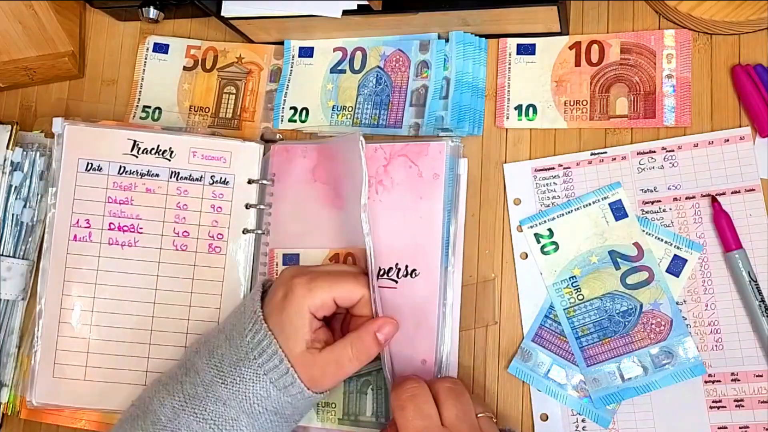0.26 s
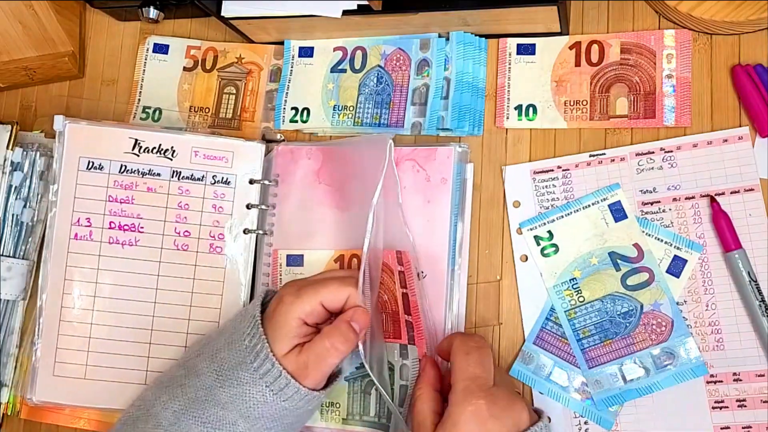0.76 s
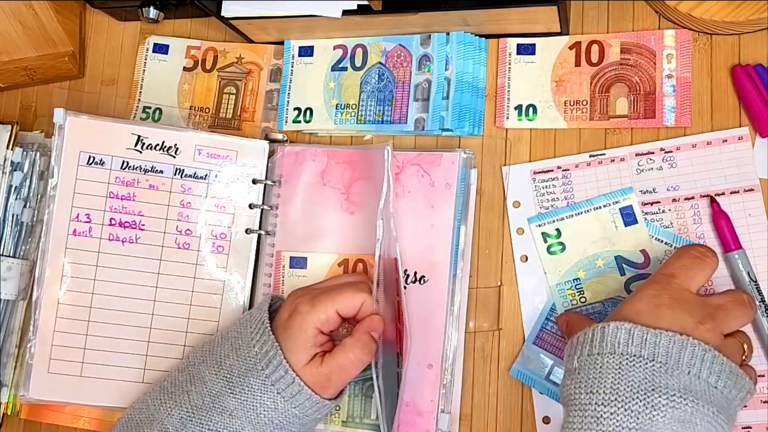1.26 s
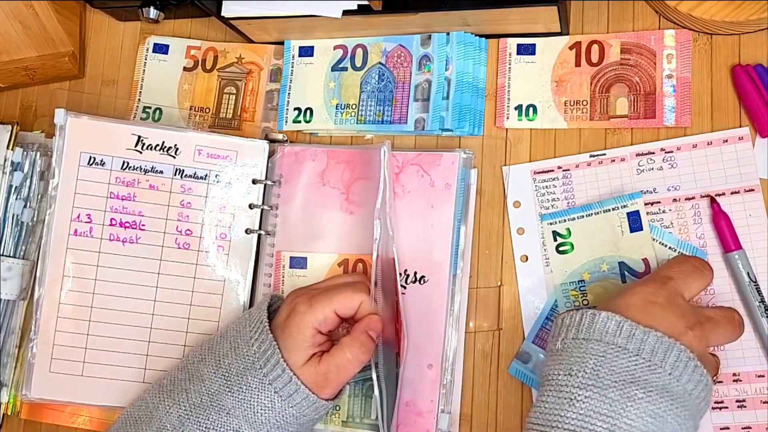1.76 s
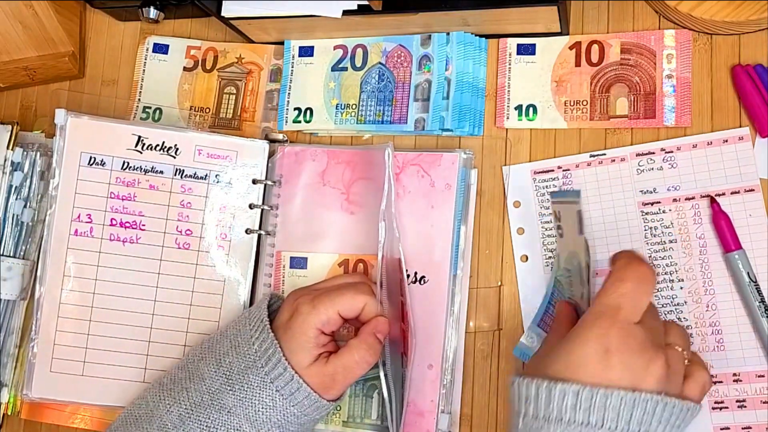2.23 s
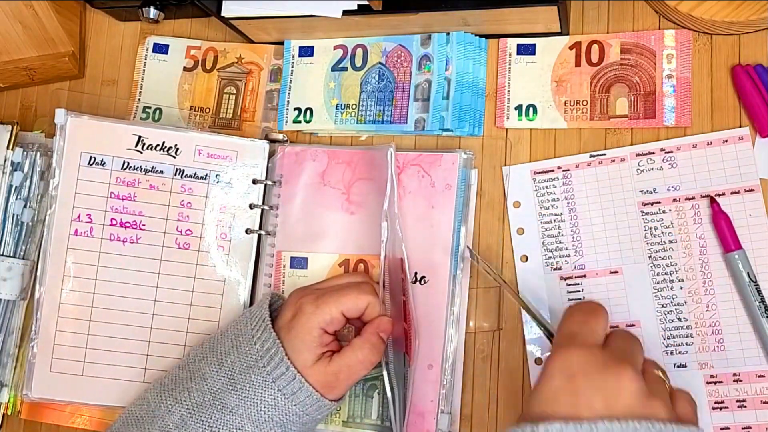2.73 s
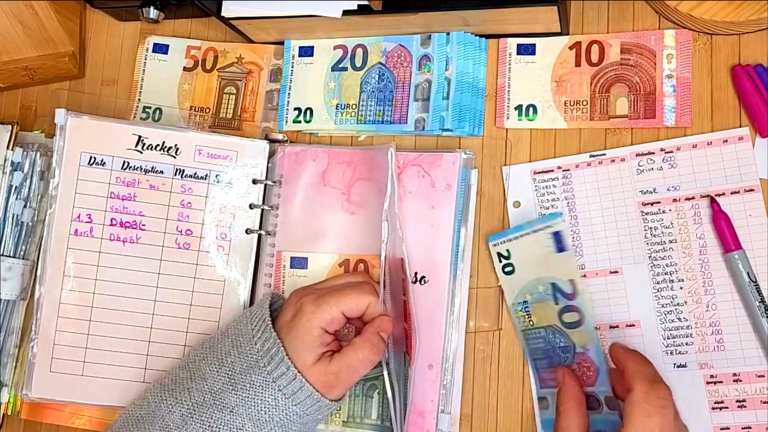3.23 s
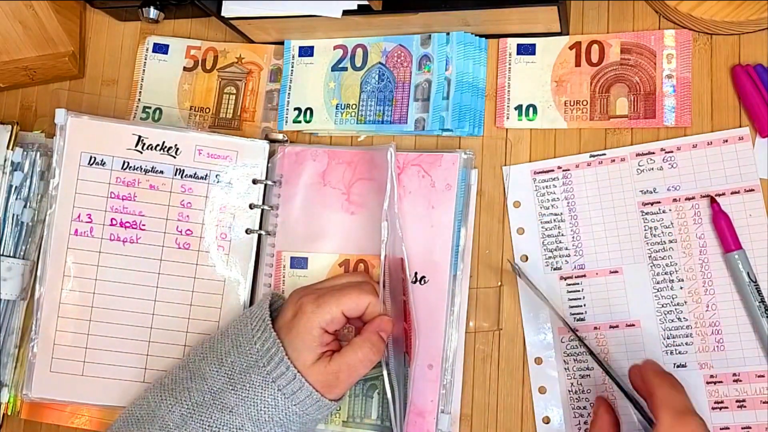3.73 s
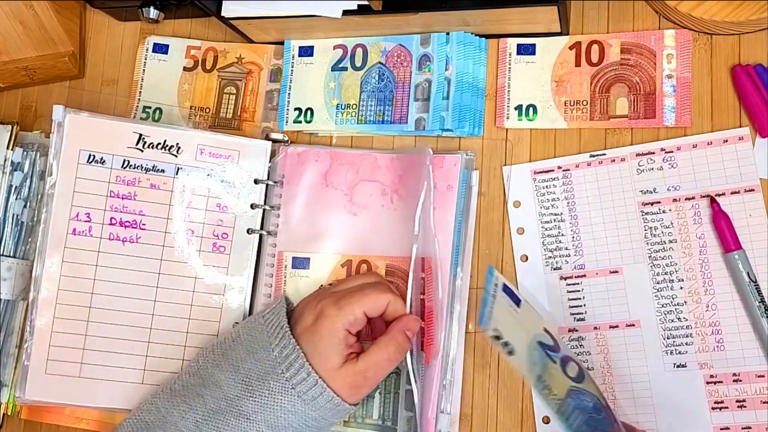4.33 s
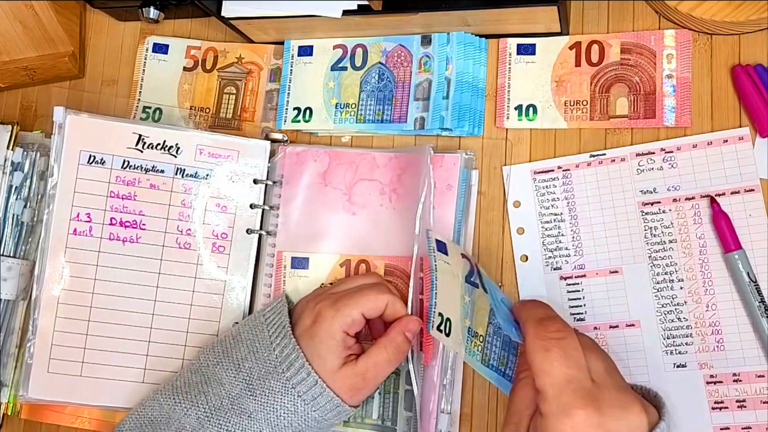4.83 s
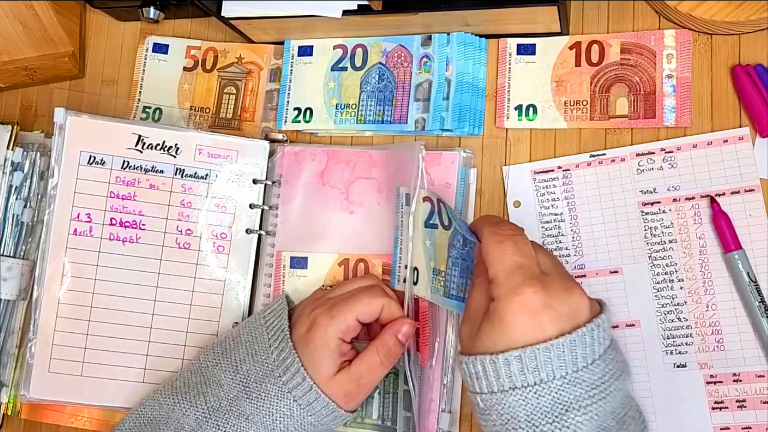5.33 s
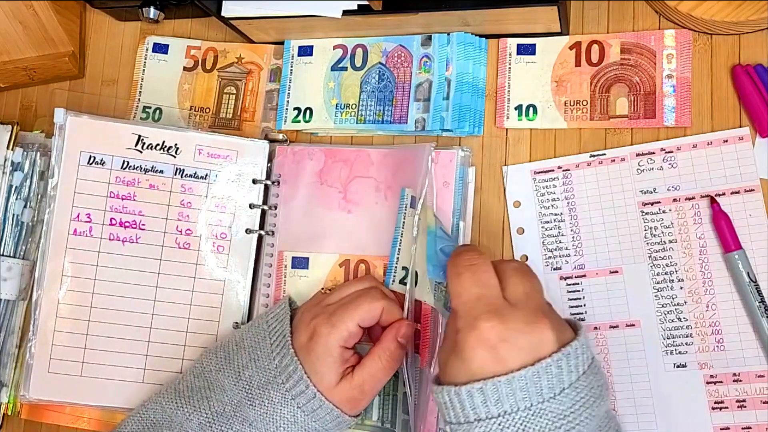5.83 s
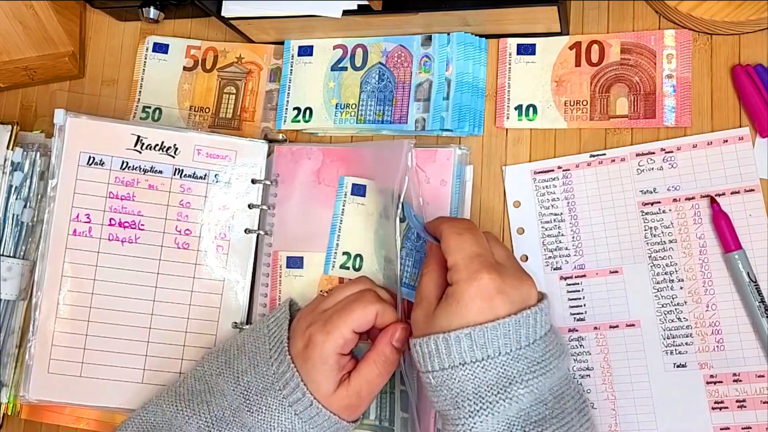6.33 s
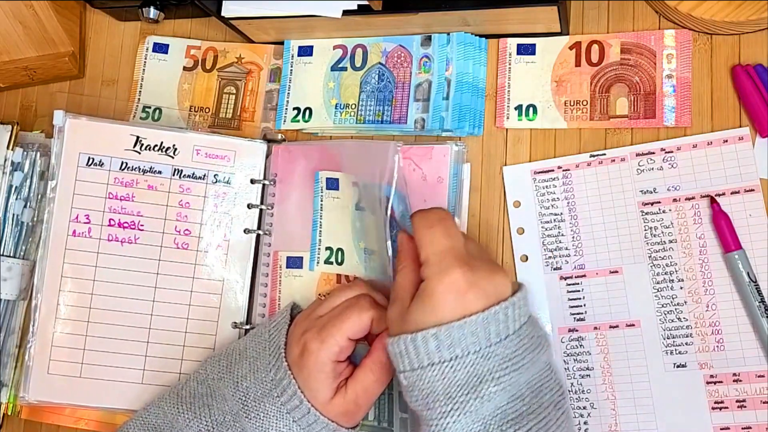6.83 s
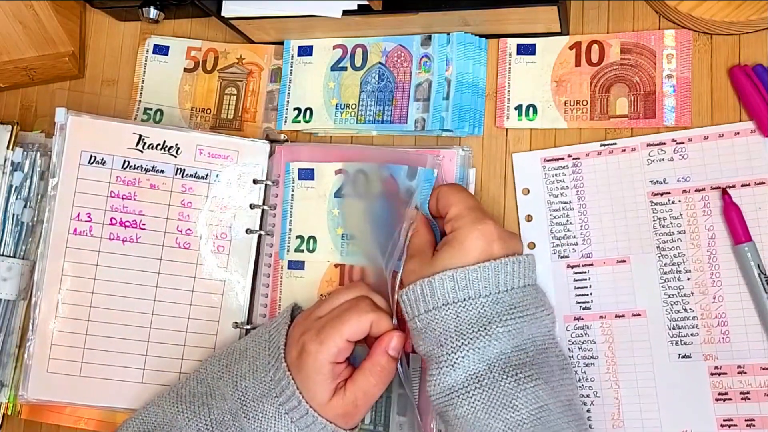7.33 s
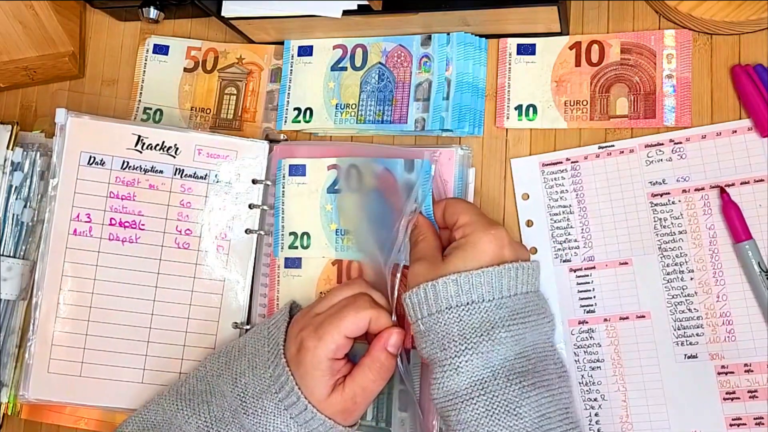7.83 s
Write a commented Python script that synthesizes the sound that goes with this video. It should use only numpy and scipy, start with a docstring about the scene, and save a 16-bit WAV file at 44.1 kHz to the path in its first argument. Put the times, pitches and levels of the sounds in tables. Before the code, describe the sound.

Crisp paper money handling and crinkling plastic at a wooden desk, with soft taps and a far door thudding in a small room.

```python
"""Paper rustles and snaps as hands open a plastic binder pocket, pick up two banknotes and slide them in.
Sheets rub in dense grains, hollower inside the pocket; their creases crack, ring and flutter.
Fingers knock on the binder and the wooden desk. A far door thuds through the floor and rattles
the furniture. The small room adds a short echo, a hush and a low rumble."""
import sys
import numpy as np
from scipy import signal
from scipy.fft import rfft, irfft, next_fast_len
from scipy.io import wavfile
from scipy.ndimage import uniform_filter1d

SR = 44100
rng = np.random.default_rng(int(sys.argv[2]) if len(sys.argv) > 2 else 0)


def transcribe(signal):
    """Save signal, clipped to [-1, 1], as a 16-bit WAV file at the path in sys.argv[1]."""
    frames = np.atleast_2d(signal).T
    limited = np.clip(frames, -1, 1)
    pcm = np.round(limited * 32767).astype(np.int16)
    wavfile.write(sys.argv[1], SR, pcm)


N = 355575

# tone of rubbed and snapped paper: (frequency [Hz], level per Hz [dB])
PAPER_SPECTRUM = [(120, -62), (200, -8), (294, -0.5), (538, -3), (579, 3.5), (659, -4.5), (899, 4),
                  (1060, -1), (1980, 10.5), (2800, 2), (6760, 4.5), (8580, 9.5), (12600, 8), (16000, 4.5)]


def from_db(db):
    """Gain of a level in dB."""
    return 10 ** (np.asarray(db) / 20)


def rms_one(x):
    """Scales to rms 1."""
    return x / np.sqrt(np.mean(x ** 2) + 1e-20)


def in_time(points):
    """A (time, value) curve, sample by sample."""
    return np.interp(np.arange(N) / SR, *np.transpose(points))


def at_hz(points, hz):
    """A (frequency, value) curve read on a log-frequency axis."""
    known_hz, values = np.transpose(points)
    return np.interp(np.log(hz), np.log(known_hz), values)


def colour(x, spectrum):
    """Gives white input a spectrum in dB."""
    size = next_fast_len(N, real=True)
    hz = np.maximum(np.arange(size // 2 + 1) * SR / size, 1)
    return irfft(rfft(x, size) * from_db(at_hz(spectrum, hz)), size)[..., :N]


def stereo(x):
    """Two unrelated signals become left and right, alike in the bass and unlike in the treble."""
    # stereo image: (frequency [Hz], left-right correlation [-1..1])
    likeness = [(60, 0.88), (180, 0.76), (550, 0.5), (1650, 0.32), (4970, 0.009), (15000, -0.26)]
    size = next_fast_len(N, real=True)
    hz = np.maximum(np.arange(size // 2 + 1) * SR / size, 1)
    alike = np.clip(at_hz(likeness, hz), 0, 1)
    mid, side = rfft(x, size) * np.sqrt([1 + alike, 1 - alike])
    return irfft([mid + side, mid - side], size)[:, :N] / np.sqrt(2)


def widen(mid, side):
    """Left and right from mid and side."""
    return mid + side * np.array([[1], [-1]])


def pan(left_db):
    """Left and right gain; positive leans left."""
    return from_db(np.array([left_db, -left_db]) / 2)


def drift(rate_hz):
    """A smooth random wander of rms 1."""
    step = 40
    r = np.exp(-2 * np.pi * rate_hz * step / SR)
    slow = signal.lfilter([1], [1, -2 * r, r * r], rng.standard_normal(N // step + 2002))[2000:]
    return np.interp(np.arange(N) / step, np.arange(len(slow)), rms_one(slow))


def grainy_noise(spread_db):
    """Two white noises whose level jumps from sample to sample."""
    return rng.standard_normal((2, N)) * from_db(spread_db * np.minimum(rng.exponential(1, N), 5))


def resonate(x, peaks):
    """Parallel resonances of alternating sign: (frequency [Hz], width [Hz], level [dB])."""
    out = 0
    for k, (hz, width, db) in enumerate(peaks):
        r = np.exp(-np.pi * width / SR)
        poles = [1, -2 * r * np.cos(2 * np.pi * hz / SR), r * r]
        out += (-1) ** k * from_db(db) * signal.lfilter([(1 - r * r) / 2, 0, (r * r - 1) / 2], poles, x)
    return out


def bands(x):
    """Splits into middle, body, edge and sheen."""
    cuts = [([1300, 3000], "band"), ([300, 1300], "band"), ([3000, 6500], "band"), (6500, "high")]
    return [signal.sosfilt(signal.butter(3, hz, kind, fs=SR, output="sos"), x) for hz, kind in cuts]


def swells(s, hold, db, rise, fall):
    """Summed envelopes that peak at s, hold and fade; rise and fall in s per 20 dB, 5 ms at least."""
    step = 100
    t = np.arange(N // step + 2)[:, None] * step / SR
    before = np.maximum(s - t, 0) / np.maximum(rise, .005)
    after = np.maximum(t - s - hold, 0) / np.maximum(fall, .005)
    gain = from_db(db - 20 * (before + after)).sum(axis=1)
    return np.interp(np.arange(N) / step, np.arange(len(t)), gain)


def room_hush():
    """A faint, steady bed of room tone."""
    # room tone: (frequency [Hz], level per Hz [dB])
    spectrum = [(88, -25.5), (150, 11.5), (194, 1), (356, 3), (643, -10), (2350, -10), (3490, -23),
                (7510, -9.5), (15300, -18.5), (16500, -32.5)]
    return from_db(-68) * rms_one(colour(stereo(rng.standard_normal((2, N))), spectrum))


def room_rumble():
    """Deep noise that wavers; now and then a low bump of the desk swells it."""
    # tone of the rumble: (frequency [Hz], level per Hz [dB])
    spectrum = [(12, -48), (20, -5.5), (59, 4.5), (70, 10), (87, -12), (118, 3.5), (173, -35.5), (220, -13),
                (290, -30.5), (480, -120)]
    # its slow rise and fall: (time [s], level [dB])
    bed_levels = [(0, -62.5), (1.5, -65), (3, -61.5), (4, -64.5), (4.9, -64), (5.5, -59.5), (6.1, -59.5),
                  (6.9, -60), (7.5, -62.5), (8.06, -67.5)]
    # low bumps of the desk on top: (time [s], level [dB])
    surges = [(0.454, -52), (1.34, -58), (3.25, -60), (4.34, -59.5), (4.61, -60.5), (5.6, -60),
              (6.02, -46.5), (7.18, -59), (7.92, -60.5)]
    s, db = np.transpose(surges)
    gain = from_db(in_time(bed_levels) + 1.6 * drift(4.5)) + swells(s, 0, db, rise=.077, fall=.077)
    return gain * rms_one(colour(stereo(rng.standard_normal((2, N))), spectrum))


def room_echo(x):
    """A diffuse tail for each side that dies band by band, after a short gap."""
    # decay of the room: (frequency [Hz], t60 [s])
    decay_times = [(200, 0.25), (1000, 0.12), (4000, 0.14), (12000, 0.089)]
    t, tail = np.arange(SR // 2) / SR, 0
    for low in 100 * 2 ** np.arange(0, 7.5, .5):
        band = signal.butter(2, [low, low * np.sqrt(2)], "band", fs=SR, output="sos")
        fade = from_db(-60 * t / at_hz(decay_times, low)) * np.clip(t / .0015 - .3, 0, 1)
        tail += signal.sosfilt(band, rng.standard_normal((2, len(t)))) * fade
    return signal.fftconvolve(x, tail / np.sqrt(np.sum(tail ** 2) / 2), axes=1)[:, :N]


def door_thud(sway_hz=38.3, right_lead_rad=.44, rise=.025, rattle_lead_s=.035):
    """The floor sways at its lowest mode, booms in the next ones and shakes the furniture."""
    # the thud and its after-bumps: (time [s], sway hold [s], level [dB], boom [dB], rattle [dB])
    bumps = [(1.723, .05, -24, -6, -11), (1.85, .1, -30.5, -6.5, -15.5), (2.12, .03, -42.5, -4.5, -4.5),
             (2.27, .01, -48, -10, -16.5), (2.42, .01, -52, -4.5, -12), (2.63, .01, -59.5, -4, 1.5),
             (2.73, 0.073, -49.5, -3, -11)]
    # boom of the floor: (frequency [Hz], width [Hz], level [dB])
    floor_modes = [(75, 10, 0), (120, 20, -2)]
    # rattle of the furniture: (frequency [Hz], width [Hz], level [dB])
    furniture_modes = [(269.6, 33, 5.5), (372.7, 21, 3.5), (545, 97, -3), (725, 42, -9)]
    s, hold, db, boom_db, rattle_db = np.transpose(bumps)
    mid, side = rng.standard_normal((2, N))
    shake = widen(mid, .27 * side)
    sway = np.sqrt(2) * np.sin(2 * np.pi * sway_hz * np.arange(N) / SR + [[0], [right_lead_rad]])
    sway *= swells(s, hold, db, rise, fall=.2) * from_db(1.5 * drift(12))
    boom = rms_one(resonate(shake, floor_modes)) * swells(s, 0, db + boom_db, rise, fall=.25)
    rattle = rms_one(resonate(shake, furniture_modes))
    rattle *= swells(s - rattle_lead_s, rattle_lead_s, db + rattle_db, rise, fall=.22)
    return (sway + boom + rattle) * pan(-2.3)[:, None]


def finger_knocks(gain_db=-6):
    """A fingertip strikes every mode: a heavy hand wakes the lowest, a hard nail the upper ones."""
    # fingers on binder and desk: (time [s], level [dB], hand weight [dB], nail hardness [dB])
    knocks = [(0.191, -36.5, -27, -20), (0.422, -36.5, -10, -19), (0.756, -28.5, -32, -17),
              (1.55, -41, -9, 4), (2.094, -50, -7, 0), (2.624, -35.5, -20, 6.5), (4.433, -41.5, -16, 10.5),
              (4.7, -68, 0, 21), (4.982, -55, -10.5, 16), (5.458, -27, -34, 0.5), (6.483, -45.5, -10, 4),
              (6.762, -59, -16, -2), (6.889, -50, -16, 4), (7.142, -32, -21, 4), (7.955, -33.5, -32.5, -18),
              (7.993, -38, -26.5, -25)]
    # ring of the desk: (frequency [Hz], level [dB], t60 [s])
    desk_modes = [(109, 7, 0.24), (266.3, -9.5, 0.16), (353, -4, 0.12), (404.6, 1.5, 0.043),
                  (485, -8.5, 0.074), (608, -2, 0.094), (718, 0.5, .12), (856, 1.5, 0.068),
                  (1006, -1.5, 0.066)]
    s, knock_db, weight_db, nail_db = np.transpose(knocks)
    scatter = rng.normal(0, 2, (len(s), len(desk_modes)))
    out = np.zeros(N)
    for k, ((hz, mode_db, t60), scatter_db) in enumerate(zip(desk_modes, scatter.T)):
        touch_db = weight_db if hz < 200 else nail_db if hz > 500 else 0
        hits = np.full(N, 1e-18)
        hits[np.round(s * SR).astype(int)] = from_db(knock_db + mode_db + gain_db + scatter_db + touch_db)
        r, w = from_db(-60 / (t60 * SR)), 2 * np.pi * hz / SR
        out += (-1) ** k * signal.lfilter([0, np.sin(w)], [1, -2 * r * np.cos(w), r * r], hits)
    return uniform_filter1d(out, size=29, origin=14)   # the soft contact dulls the attack


def sheet_rubbing(ticks_per_s=100, waver_db=2.22, flicker_db=1.27):
    """Fibres slip as dense uneven grains, small creases tick in clumps; the pocket adds resonances."""
    # strokes of sheet on sheet: (time [s], hold [s], level [dB], rise [s per 20 dB],
    # fall [s per 20 dB], body [dB], brightness [dB])
    strokes = [(0.022, 0.001, -51, .1, 0.1, 3, -3), (0.1, 0.001, -67, -0.2, 0.22, 9.5, -7),
               (0.196, 0.031, -64, 0.05, 0.09, 6, 6), (0.405, 0.089, -59.5, -0.19, 0.07, -0.5, -2),
               (0.615, 0.001, -74, 0.3, 0.6, -12, 9), (0.823, 0.001, -66, 0.15, -0.05, 4.5, 3),
               (0.995, 0.0011, -50.5, 0.1149, -0.21, 0, -7), (1.16, 0.001, -92, 2, 0.3, -0.5, 19),
               (1.295, 0.0011, -52.5, 0.01, 0.07, 6.5, 2), (1.369, 0.13, -52.5, 0.09, -0.04, -13, 0),
               (1.543, 0.001, -40, 0.0253, 0.02, -13, 0), (1.749, 0.001, -46, 0.17, 0.19, 1, -12.5),
               (1.863, .07, -49.5, -0.0149, 0.15, -1.5, 0), (2.137, 0.001, -36.5, 0.0864, 0.2137, -7, -0.5),
               (2.302, 0.048, -56, 0.07, 0.04, -3, 6.5), (2.6, 0.092, -51.5, -0.1, 0.0551, -3.5, 7),
               (2.75, 0.045, -56.5, 0.12, 0, 0.5, 13.5), (2.946, 0.03, -79.5, 0.13, -0.15, 7, 23),
               (3.023, 0.001, -72, 0.2, 0.3, -4, -16), (3.113, 0.087, -64.5, 0.0247, 0.1, -12, 25.5),
               (3.213, 0.016, -54, 0.11, 0.13, -12, 2.5), (3.296, 0.082, -53, 0.17, 0.0533, 2, -4),
               (3.46, 0.055, -58, .045, 0.04, -1.5, 7), (3.66, 0.001, -62, 0.06, .066, 0, 0),
               (3.88, 0.0011, -79.5, 0.4, 0.3, 0.5, 13.5), (4.019, 0.001, -67, 0.03, 0.15, 2, 9.5),
               (4.169, 0.001, -61, 0.05, 0.06, -3, 10.5), (4.244, 0.11, -66.5, 0.07, 0.07, -2, 9.5),
               (4.402, 0.1, -60, .1, 0.06, -3, 4), (4.777, 0.001, -71, 0.7, -0.86, -4, -0.5),
               (4.867, 0.00089, -73, .054, -0.12, 7, -14), (5.01, 0.074, -61.5, -0.15, 0.05, 1, -1),
               (5.138, 0.001, -57, 0.14, 0.42, -5, 5), (5.35, 0.00093, -34, 0.08, .16, -20.5, -3),
               (5.555, 0.001, -65, 0.02, 0.1, 8, -7), (5.69, 0.00091, -74.5, 0.3, -0.1, 0, 23.5),
               (5.772, 0.00089, -39.5, 0.03, .064, -1.5, -3), (5.948, 0.065, -42, 0.0258, 0.23, -4, -4.5),
               (6.252, 0.084, -36.5, 0.1526, 0.0961, -11.5, -6.5), (6.445, 0.14, -62.5, 0.2, 0.14, 1.5, 7),
               (6.625, 0.034, -40, .05, 0.04, -20, -4), (6.698, 0.001, -59, .05, 0.17, 1, -7),
               (6.83, 0.097, -54.5, 0.03, .1, -6, 0.5), (6.936, 0.11, -47.5, 0.09, 0.11, -8, -4),
               (7.341, 0.001, -43.5, 0.16, 0.0939, -2.5, -11), (7.441, 0.18, -67.5, 0.13, 0.12, -4.5, 6.5),
               (7.712, 0.001, -67, -0.14, 0.13, 5.5, -6.5), (7.947, 0.041, -62, .047, .056, -1, -4)]
    # how far the notes are in the pocket: (time [s], pocket level [dB])
    pocket_depth = [(0, -14.5), (4.9, -15.5), (5.3, -7.5), (7.0, -5), (7.5, -11.5), (8.1, -9.5)]
    # air and film of the pocket: (frequency [Hz], width [Hz], level [dB])
    pocket_modes = [(390, 90, -8), (730, 110, -2), (1300, 220, -4), (2080, 280, 0), (2400, 250, -4)]
    s, hold, db, rise, fall, body_db, bright_db = np.transpose(strokes)
    inside = from_db(in_time(pocket_depth))
    grains = grainy_noise(spread_db=1.5)
    ticks = rng.random(N) < ticks_per_s * from_db(6 * drift(15)) / SR
    tick_sizes = from_db(5.5 + 3.27 * np.minimum(rng.exponential(1, N), 3))
    tick_sizes /= 1 + 6 * inside   # the film damps them
    grains[0] *= 1 + signal.lfilter([1], [1, -.96], ticks * tick_sizes)
    grains = stereo(grains)
    # the colour shifts as the sheets bend: each band wavers on its own
    paper = bands(colour(grains, PAPER_SPECTRUM))
    middle, body, edge, sheen = (from_db(waver_db * drift(17)) * rms_one(band) for band in paper)
    film_grains = np.roll(grains, shift=SR, axis=1)
    hollow = inside * rms_one(resonate(film_grains, pocket_modes))
    layers = [(middle + hollow, 0), (body, body_db), (edge, 1 + .5 * bright_db), (sheen, bright_db)]
    sheets = sum(layer * swells(s, hold, db + tone_db, rise, fall) for layer, tone_db in layers)
    # the pocket's echo scoops out one band
    sheets -= np.clip(2 * inside, 0, .65) * resonate(sheets, [(1620, 420, 0)])
    return from_db(flicker_db * drift(20)) * sheets


def crease_snaps(ring_db=-6.5, ring_t60=.065, flutter_t60=.13, crack_s=.0005, crack_samples=600):
    """A crease gives way in a crack of a few spikes; the sheet flutters on in a dying crackle."""
    # snapping creases: (time [s], level [dB], body [dB], brightness [dB], flutter [dB], ring [Hz])
    creases = [(0.0897, -59, -18, 0, -3, 937), (0.194, -52, -6, -20, -0.5, 1490),
               (0.2494, -59, -6, 14.5, -6.5, 921), (0.389, -60, -0.5, 10, -18, 1530),
               (0.4234, -29.5, -3, -6, -10, 1530), (0.5422, -57.5, -17, 25.5, -7.5, 1140),
               (0.6326, -65, -4, 15, -8, 1920), (0.6652, -80, -6, 38.5, -4, 1220),
               (0.7022, -58, -20, 33, -12.5, 2660), (0.7547, -58, 9, 5, -10, 480),
               (0.795, -64, -5, 6, -14, 2500), (0.918, -62, 4, 0, -15, 1020),
               (0.9713, -34.5, -20, -25, -10, 2030), (1.1376, -70.5, 6, 25, -15, 703),
               (1.2447, -50.5, 8, -4.5, -0.5, 950), (1.291, -43, -5, -11, -3, 895),
               (1.336, -34.5, -8, 0, -6.5, 2500), (1.3428, -23, -7, 2.5, -10.5, 2680),
               (1.395, -35, -0.5, -12, -5, 910), (1.532, -38, -12, 1, -6, 2600),
               (1.545, -34.5, -11, 0, -6, 2900), (1.5511, -20, -3.5, 1, -4.5, 2780),
               (1.638, -41, -12, -1, -4, 2800), (1.6442, -26, -9, -1.5, -13.5, 2820),
               (1.7384, -34.5, -14, -28, -9.5, 860), (1.8558, -31, -15, -5, -14, 860),
               (1.9175, -40, -10, 5, 0, 1710), (2.0033, -12.5, -5.5, 0, -10, 1357),
               (2.083, -34, -7.5, 2, -3, 2800), (2.0897, -24, -8, 0, -8, 2640),
               (2.093, -18, -1, -1.5, -9, 1250), (2.097, -19.5, -8, 0, -14, 1926),
               (2.1201, -27, -15, -3, -21, 1470), (2.1377, -30, -9, 2.5, -10, 3130),
               (2.146, -22, -3, 12, -10.5, 3046), (2.253, -35, -17, 7, -17, 597),
               (2.3721, -37.5, -3, 7.5, -5, 2500), (2.6036, -41.5, 1.5, 5, -8, 1670),
               (2.6218, -26, 0, 1.5, -4.5, 653), (2.931, -65, 0, 7.5, -3, 593),
               (3.0934, -62, -13, 23, -8, 1890), (3.2131, -35.5, -22, 0, -5.5, 2310),
               (3.2535, -35.5, -8, -27, -9.5, 2050), (3.3236, -41, -13, 1.5, -6.5, 2320),
               (3.3856, -48, -1, 12.5, -10.5, 840), (3.4465, -42.5, -12, -1, -9, 1650),
               (3.6275, -38, -5.5, 0.5, -7.5, 1920), (3.6631, -35.5, 2, 8.5, -20, 1730),
               (3.673, -37.5, 1.5, -1.5, -9, 1145), (4.0717, -66, -8, 20, -12, 970),
               (4.1739, -50.5, -17, 9, -6.5, 2080), (4.397, -40.5, 1, 5, -10, 1490),
               (4.4328, -39, -1, -5.5, 1, 880), (4.4531, -32.5, 2, -9, -21, 916),
               (4.7015, -36, -11.5, -4, -8, 2820), (4.97, -46.5, -6, -3, -9, 845),
               (4.9836, -37, -16, -1.5, -7, 2530), (4.9964, -35.5, 3, 3.5, -18.5, 753),
               (5.4314, -39, 4, -11.5, -3.5, 1044), (5.458, -16, -4.5, 0.5, -13, 587),
               (5.702, -52, -11, 11, -4.5, 2830), (6.4833, -49, -10, -9.5, 2.5, 720),
               (6.761, -54.5, 13.5, -20, -15.5, 1110), (6.8907, -29, 1.5, -2, -12, 752),
               (7.1442, -29, 2.5, -44.5, -6.5, 732), (7.956, -38, 0, -15, -6, 1020),
               (7.994, -49.5, -14, -18, -7, 1234)]
    crack_gains = from_db([-2, -4, 5, 4])   # middle, body, edge, sheen
    crackle = grainy_noise(spread_db=1.4) * from_db(2.5 * drift(90))
    flutters = [rms_one(band) for band in bands(colour(widen(*crackle), PAPER_SPECTRUM))]
    t = np.arange(SR // 5) / SR
    crack_t = t[:crack_samples]
    spikes = rng.standard_normal((len(creases), 2, crack_samples)) * crack_t * np.exp(-crack_t / crack_s)
    cracks = np.stack(bands(widen(spikes[:, :1], .4 * spikes[:, 1:])), axis=1)
    cracks /= np.abs(cracks.mean(axis=2, keepdims=True)).max(axis=3, keepdims=True)   # mid peaks at 1
    pans_db = 3 * rng.standard_normal(len(creases))
    out = np.zeros((2, N + len(t)))
    for (s, db, body_db, bright_db, flutter_db, ring_hz), crack, pan_db in zip(creases, cracks, pans_db):
        i = round(s * SR)
        ring = np.sin(2 * np.pi * ring_hz * t) * from_db(-60 * t / ring_t60)
        out[:, i:i + len(t)] += from_db(db + ring_db) * ring   # the bent sheet is a small shell
        tone_db = [0, body_db, .66 * bright_db, bright_db]
        for band_db, crack_gain, click, flutter in zip(tone_db, crack_gains, crack, flutters):
            snap = flutter[:, i:i + len(t)] * from_db(flutter_db - 60 * t / flutter_t60)[:N - i]
            snap[:, :crack_samples] += crack_gain * click
            out[:, i:i + snap.shape[1]] += from_db(db + band_db) * pan(pan_db)[:, None] * snap
    return out[:, :N]


def place_hands(x):
    """The hands move over the desk: the balance shifts, and the left side lags when they go right."""
    # the move to the binder: (time [s], left over right [dB])
    balance = [(0, -0.5), (4.8, 0.5), (5.0, 2), (8.1, -1)]
    # the reach to the right: (time [s], left delay [s])
    left_lag = [(0, 0), (.9, 0), (1.1, .00014), (4.6, .00014), (4.9, 0), (8.1, 0)]
    left, right = x * pan(in_time(balance))
    samples = np.arange(N)
    return np.array([np.interp(samples - SR * in_time(left_lag), samples, left), right])


def scene():
    """Hands on the desk, their echo in the room, the far door and the background."""
    hands = place_hands(sheet_rubbing() + finger_knocks() + crease_snaps())
    background = room_hush() + room_rumble()
    return background + hands + from_db(-9) * room_echo(hands) + door_thud()


def record(dry, dip_hz=8990, dip_width_hz=1800, dip_db=-5.5, stop_hz=16350):
    """The microphone has a dip in the treble; the top is cut."""
    dipped = dry + (from_db(dip_db) - 1) * resonate(dry, [(dip_hz, dip_width_hz, 0)])
    return signal.sosfilt(signal.cheby2(20, 60, stop_hz, fs=SR, output="sos"), dipped)


dry = scene()
out = record(dry)
transcribe(out)
```